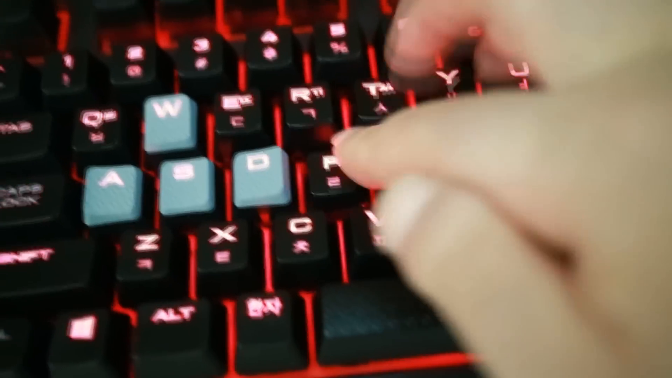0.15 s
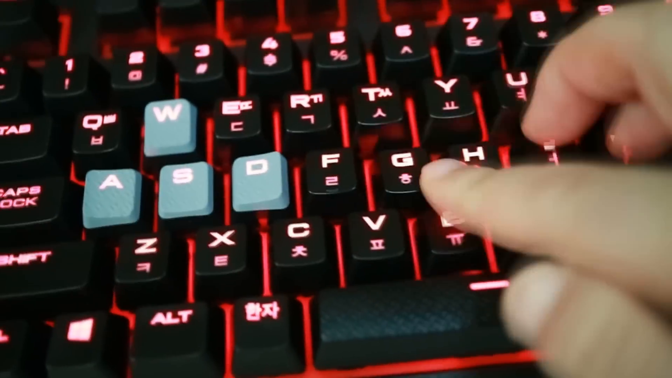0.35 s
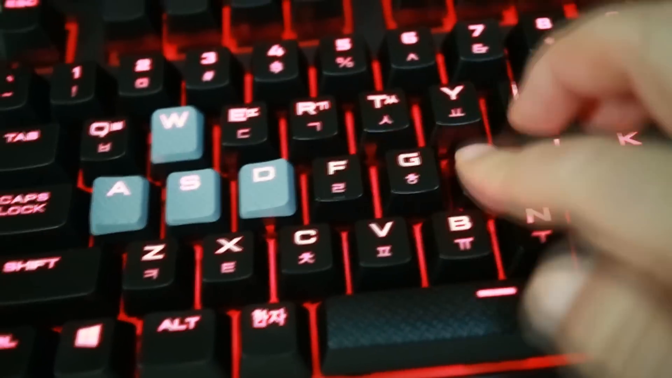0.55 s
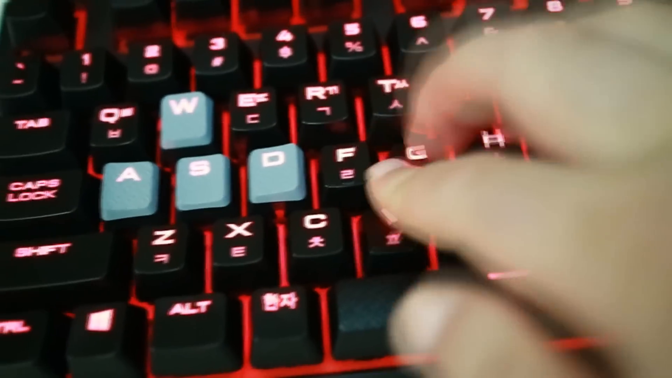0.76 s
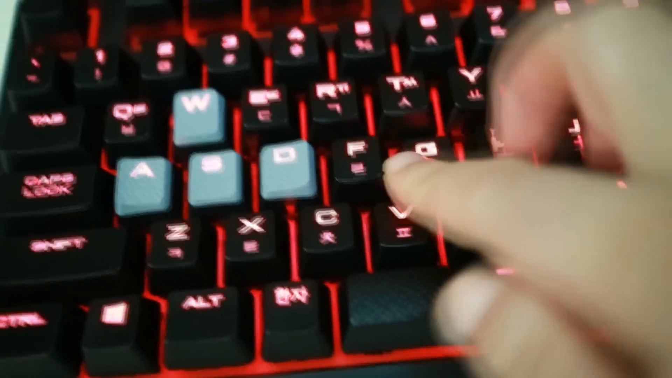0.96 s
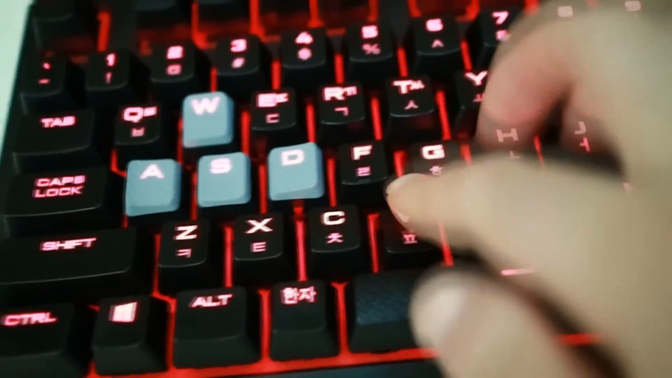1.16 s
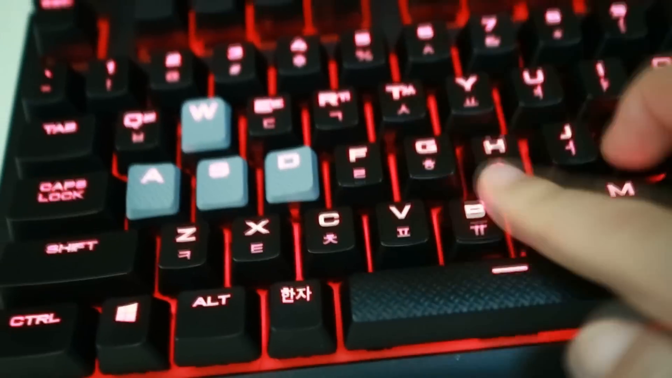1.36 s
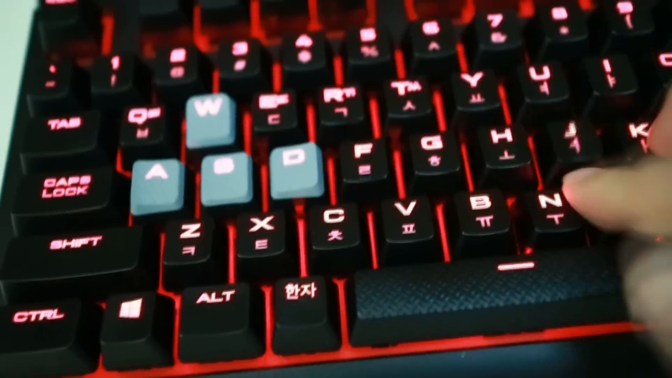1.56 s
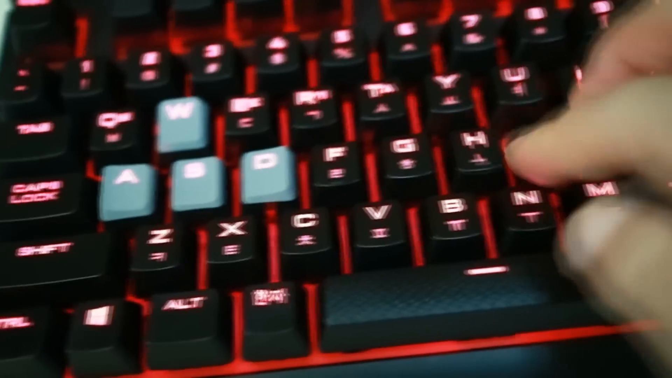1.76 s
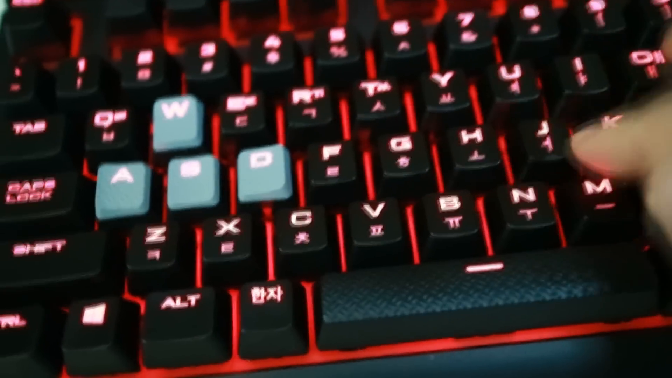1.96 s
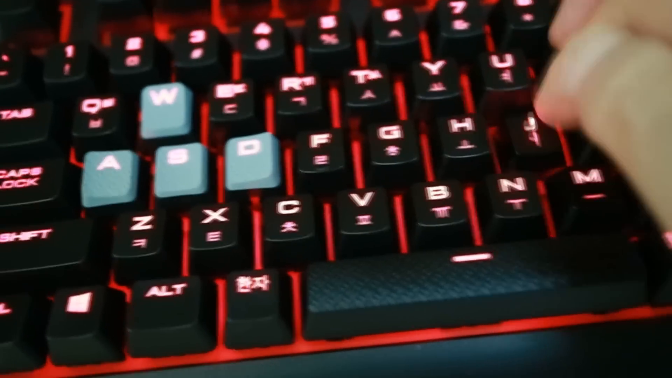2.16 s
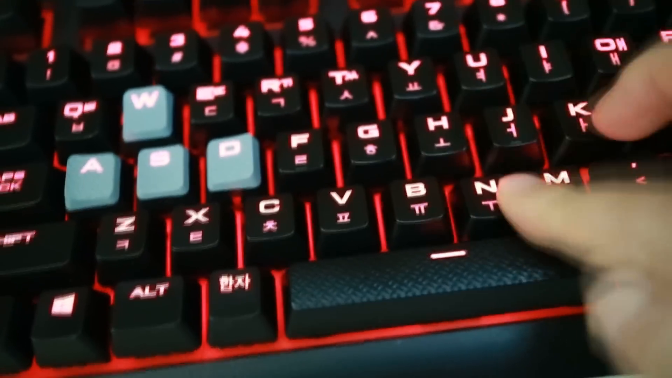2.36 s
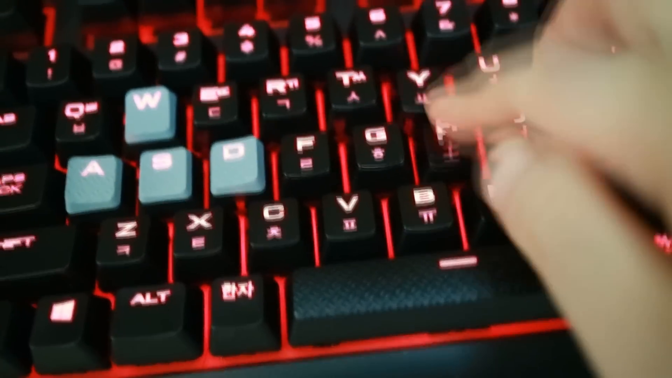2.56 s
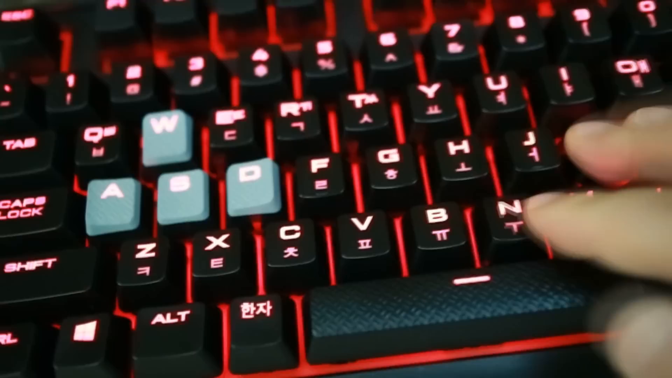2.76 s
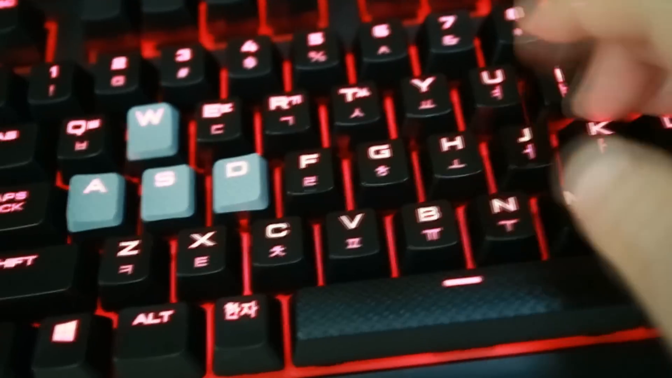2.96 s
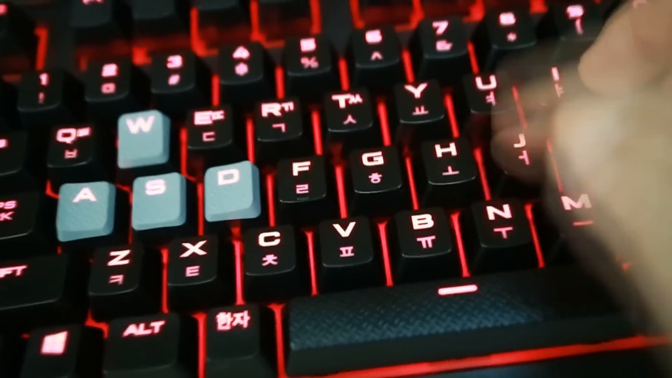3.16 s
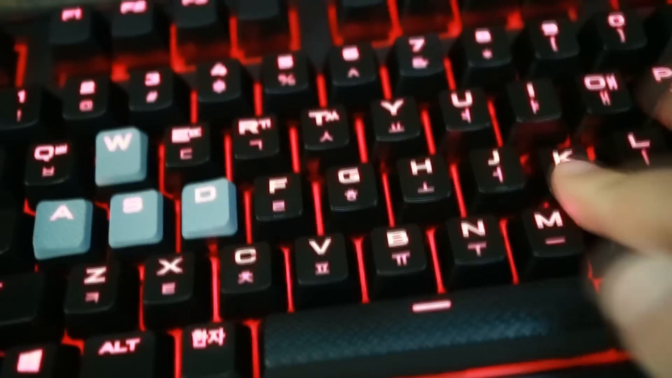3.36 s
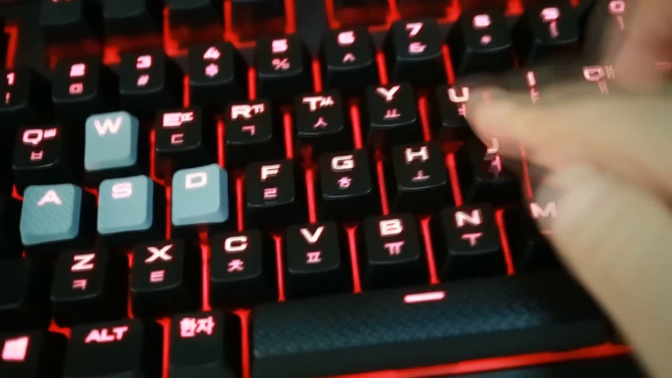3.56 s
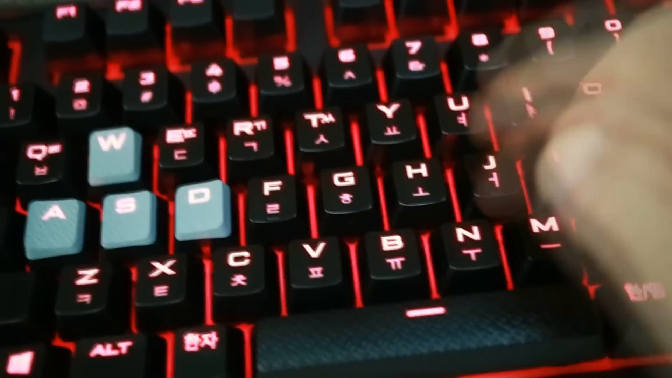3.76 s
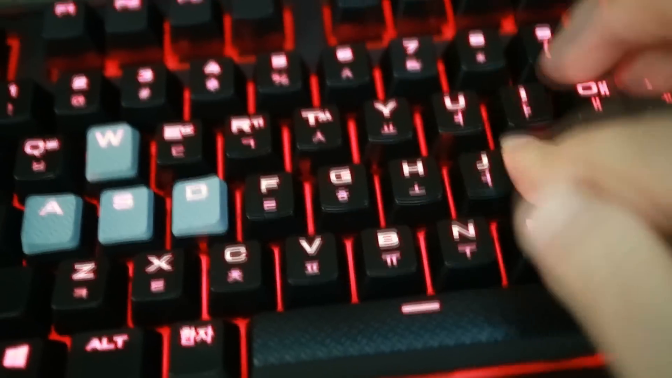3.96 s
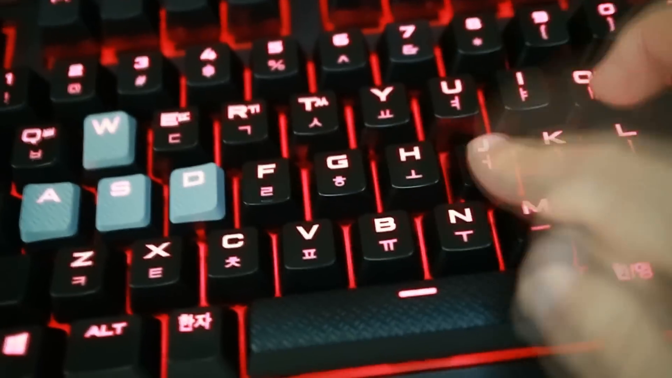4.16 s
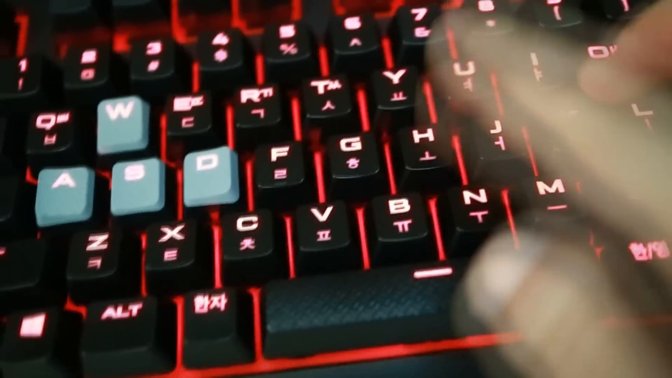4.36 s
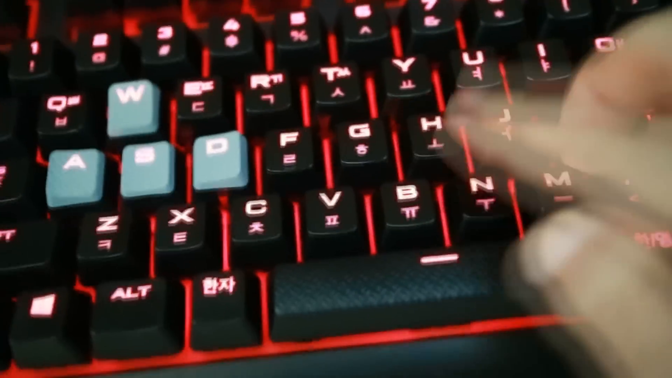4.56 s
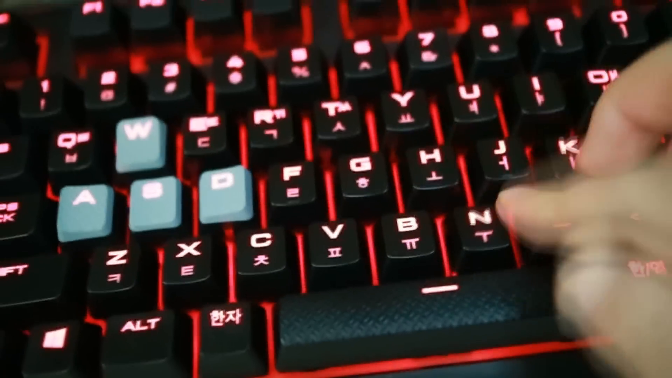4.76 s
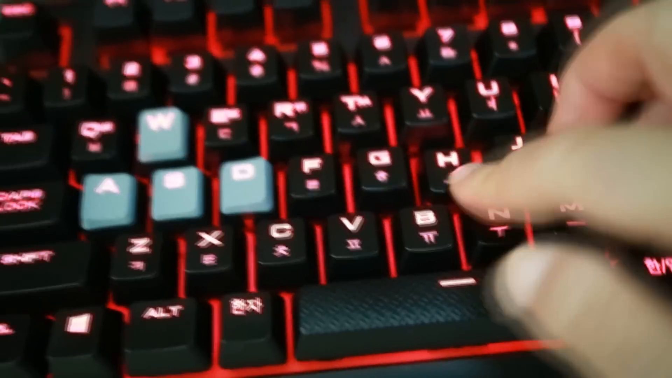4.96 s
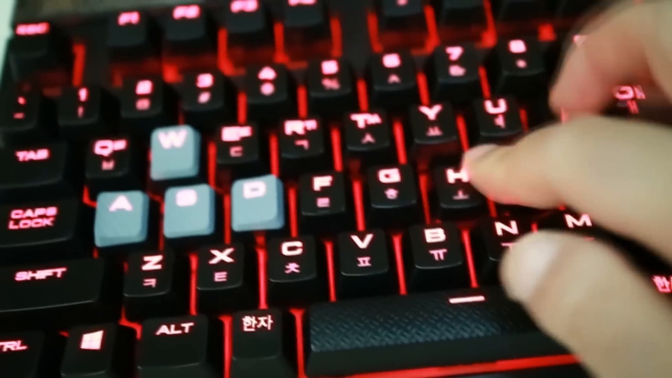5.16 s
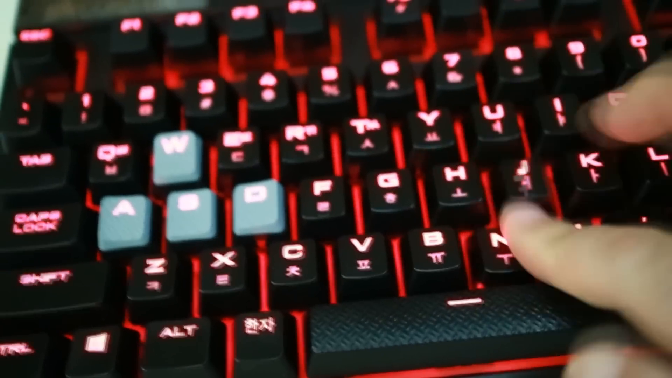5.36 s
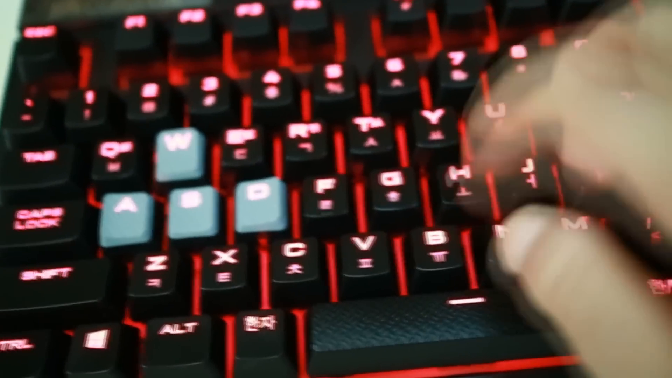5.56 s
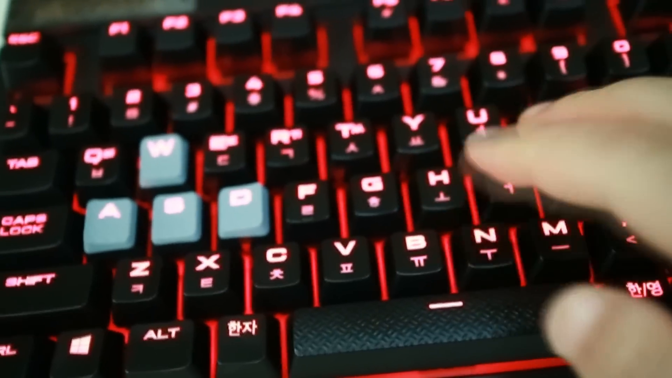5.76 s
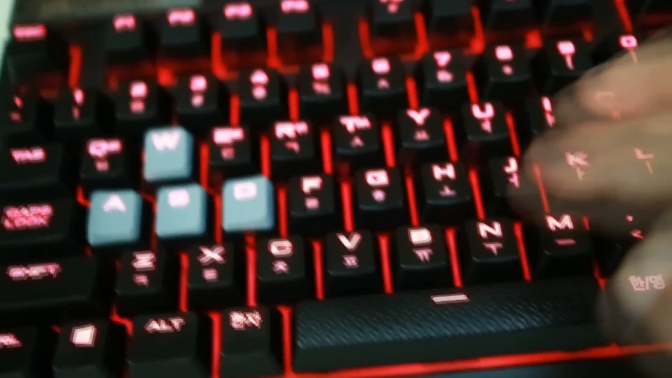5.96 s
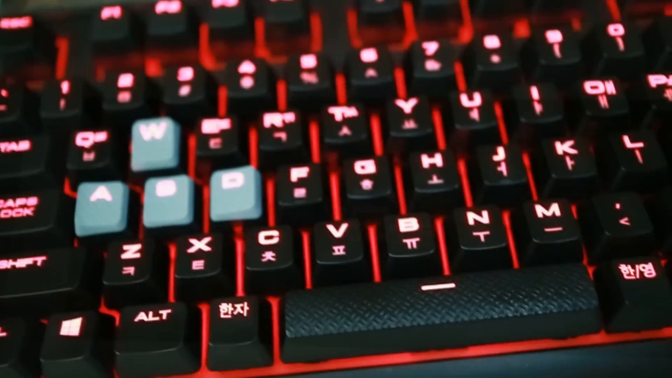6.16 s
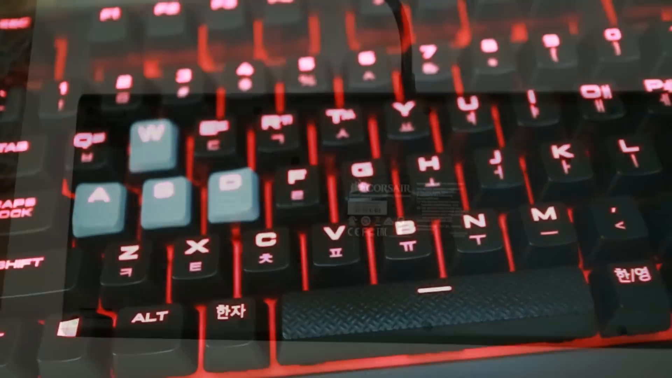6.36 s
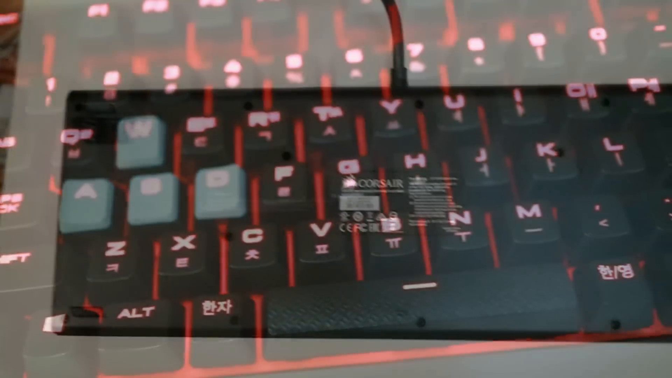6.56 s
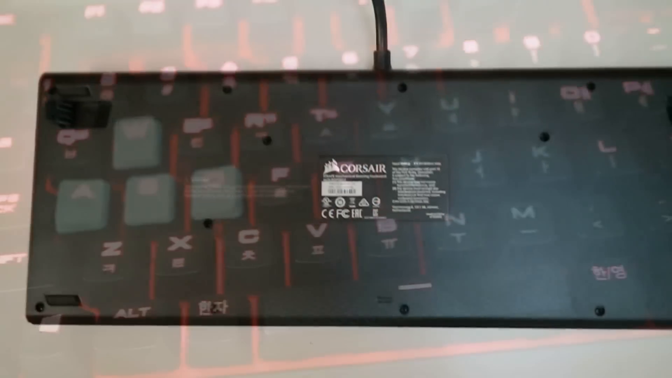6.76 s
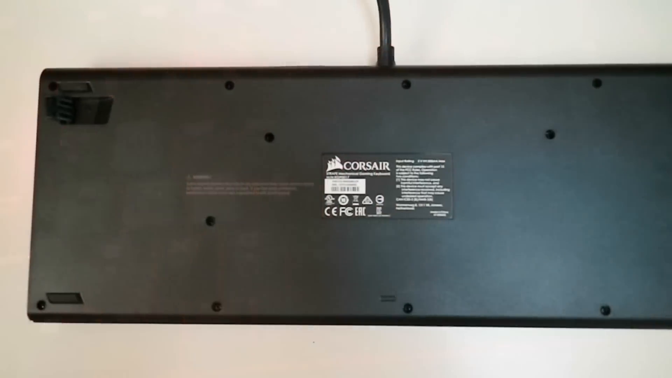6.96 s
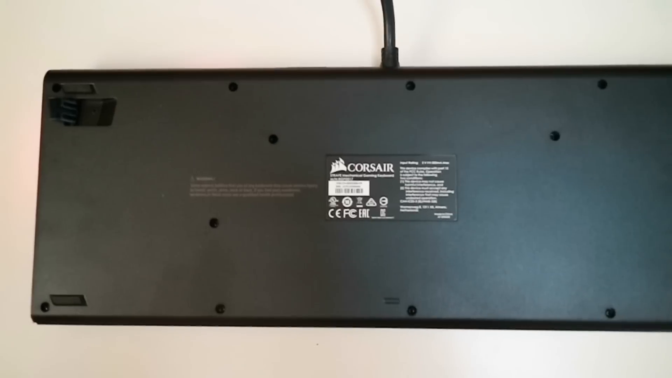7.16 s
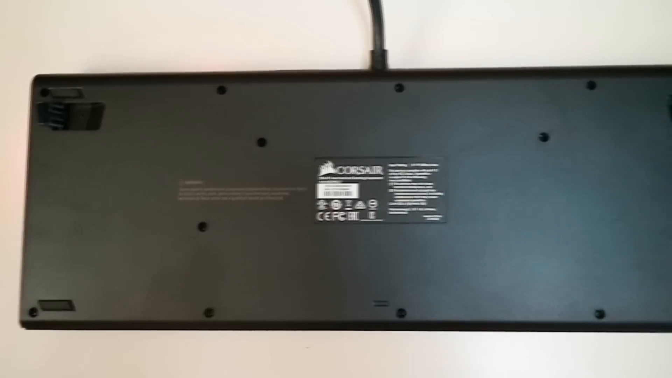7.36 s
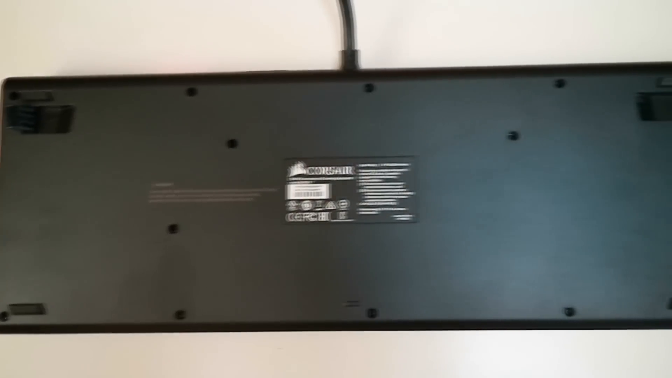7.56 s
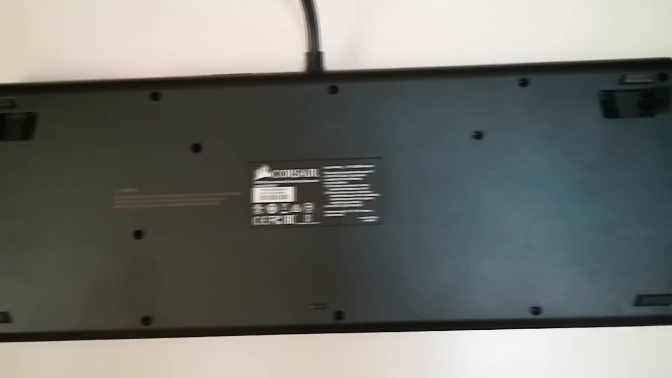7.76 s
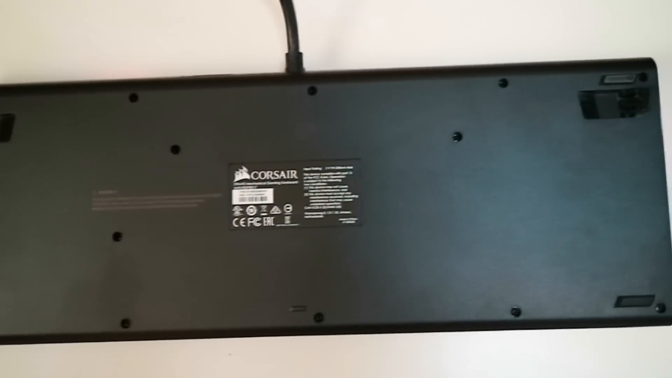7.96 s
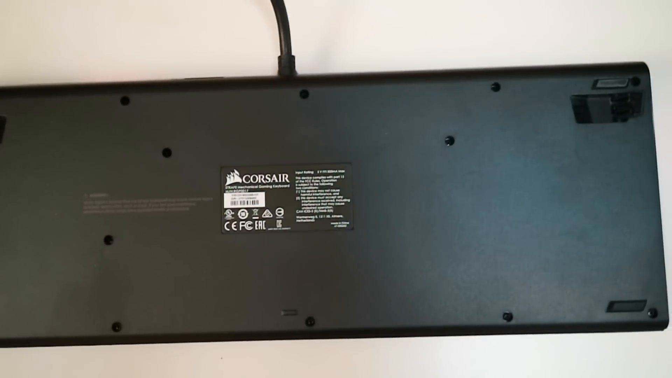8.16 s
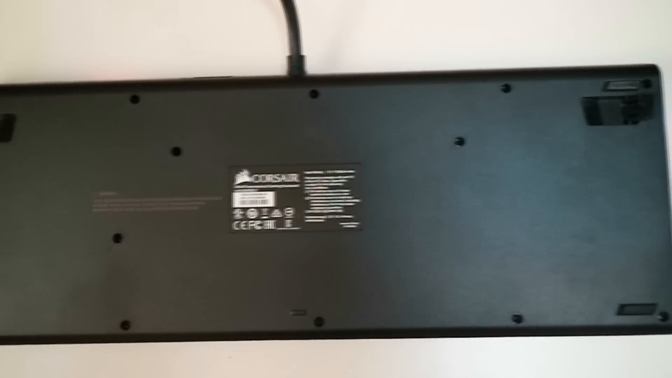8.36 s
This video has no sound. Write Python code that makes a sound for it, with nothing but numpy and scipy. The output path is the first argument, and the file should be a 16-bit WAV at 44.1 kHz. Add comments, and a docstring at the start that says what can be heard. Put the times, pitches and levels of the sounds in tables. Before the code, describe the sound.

A rapid run of hard plastic keystrokes, with treble cracks and low desk thumps, breaks off abruptly, leaving faint room noise and tiny taps.

```python
"""Fingers type fast on a mechanical keyboard on a desk, close to a phone's two microphones, in a quiet room.
Each contact of key stem, cap and plate is a short cap click and a noisy treble crack; decaying modes ring
the case and thump the desk, and noise lingers after. Stems scrape and rebound, loose caps rattle.
The typing stops and the room's hush remains, shaped noise with faint steady tones, with a few faint taps."""
import sys
import numpy as np
from scipy import signal
from scipy.fft import rfft, irfft, next_fast_len
from scipy.io import wavfile
from scipy.ndimage import uniform_filter1d

SR = 44100
rng = np.random.default_rng(int(sys.argv[2]) if len(sys.argv) > 2 else 0)


def elevation(decibels):
    """Turn decibel levels (scalar or array-like) into linear amplitude ratios."""
    levels = np.asarray(decibels, float)
    return 10 ** (levels / 20)


def generate_wav(signal):
    """Clip the signal to [-1, 1] and save it as 16-bit WAV at the path in sys.argv[1]."""
    frames = np.transpose(np.atleast_2d(signal))
    scaled = np.clip(frames, -1, 1) * 32767
    pcm = np.round(scaled).astype(np.int16)
    wavfile.write(sys.argv[1], SR, pcm)


N = 370440

# The four contact tables give clicks before the keyboard's radiation and stereo lean.
# Stems striking the plate at the end of their travel, a sharp click.
# Each row: start in seconds, click peak in dB, cap pitch in Hz.
PLATE_STRIKES = [(.1143,-12,2600),(.2856,-4,2210),(.3183,-26,3020),(.3299,-2.5,2860),(.472,-12.5,3160),(.4884,-6.5,2780),(.5159,-18.5,3440),
                 (.6414,-10.5,3020),(.6485,-1.5,2990),(.703,-20.5,4930),(.7179,-3,2620),(.845,-22,3300),(.8571,-19.5,3620),(1.0562,-9.5,3740),(1.0686,-14,2900),(1.1234,-14,4400),(1.1408,-10.5,3080),
                 (1.3335,2,2740),(1.3434,-12,2300),(1.3504,-2,2680),(1.4529,-13.5,3200),(1.461,-4.5,3010),(1.6305,-12,3100),(1.6384,-14,1740),(1.6966,-12.5,2590),
                 (1.8639,-1.5,2700),(1.8695,-9,2760),(2.0144,-9.5,3240),(2.6762,-22,3100),(2.6898,-3.5,2880),(2.8171,-15.5,2300),
                 (3.018,-17,3100),(3.0253,-4.5,2500),(3.033,-12.5,2400),(3.1652,-15.5,2240),(3.2637,-23,2840),(3.2731,-7,2450),(3.4351,-12.5,2940),(3.4664,-11,2280),
                 (3.6142,-4.5,2280),(3.6345,-6,2750),(3.7,-4,2230),(3.743,0.5,2310),(3.7922,-17.5,2830),(4.0126,-14,2500),
                 (4.151,-16,2500),(4.3071,-15,3440),(4.3119,-11,2200),(4.368,-35.5,3000),(4.3822,-15.5,2350),(4.5571,-13.5,3430),(4.6246,-23,3330),(4.8227,-19,2600),
                 (4.8804,-22.5,3070),(4.89,-4.5,2480),(5.0308,-23.5,3200),(5.0448,-13,3350),(5.1103,-7,2260),(5.121,-15,2300),(5.2777,-17.5,3300),(5.3265,-10,2600),(5.4727,-6.5,3540),
                 (5.4846,-4,2800),(5.502,-18,3000),(5.7445,-8.5,3320),(5.814,-2.5,2540),(5.8303,-17,2900),(5.965,-29.5,4000),(6.0905,-17.5,2750)]
# Fingers landing on caps and keys springing back against their housings,
# a knock with more case ring and more treble crack.
# Each row: start in seconds, click peak in dB, cap pitch in Hz.
KNOCKS = [(.0058,-14,2870),(.0327,-17.5,2890),(.0463,-16.5,3160),(.0641,-12,1080),(.071,-13,3240),(.087,-18,2000),(.161,-17.5,1490),(.2026,-27,4900),(.2296,-15.5,2970),(.2322,-12.5,2616),
          (.354,-12.5,2200),(.3772,-7,1980),(.4395,-5,2090),(.545,-8,3500),(.5555,-11,2820),(.7446,-14,2780),(.8222,-25,1430),
          (.8369,-13.5,2920),(.9094,-11.5,2950),(.9176,-12,2060),(.957,-29,2150),(.993,-4.5,3400),(1.022,-19.5,1360),(1.0354,-15.5,2380),
          (1.1318,-7,2300),(1.1531,-10,2100),(1.1908,-22.5,1300),(1.2258,-20.5,2840),(1.2325,-7.5,3580),(1.2401,-13,2180),(1.3261,-12,3200),
          (1.4073,-14.5,2320),(1.4303,-16.5,2340),(1.532,-21,1560),(1.7598,-21,1740),(1.7738,-14.5,2400),(1.8098,-28.5,2970),
          (1.8561,-18,3000),(1.9155,-29.5,2820),(1.9298,-21.5,2400),(1.9432,-8.5,2300),(1.9609,-23.5,2270),(2.0086,-19.5,2300),(2.0699,-17,2420),(2.1535,-14.5,2540),
          (2.171,-9.5,1590),(2.2367,-28.5,1550),(2.2534,-18,2480),(2.2613,-16.5,2350),(2.303,-31.5,2900),(2.3306,-12,2900),(2.422,-19,2300),(2.461,-16.5,3160),(2.4732,-15,4000),(2.5033,-25,2300),
          (2.5391,-18,2300),(2.5967,-20,2900),(2.623,-18,3480),(2.75,-14.5,2990),(2.7647,-19,3260),(2.8237,-13.5,3440),(2.9437,-14.5,2940),
          (3.06,-22,2020),(3.0715,-22,1750),(3.1362,-14.5,1820),(3.1568,-16,3280),(3.3151,-14,2200),(3.3567,-33,2400),(3.423,-10.5,1850),(3.457,-12,1940),
          (3.5552,-27,1290),(3.588,-14.5,2800),(3.5948,-19,1690),(3.6871,-10.5,1900),(3.8088,-12.5,2300),(3.8142,-21.5,1960),(3.8968,-22.5,1630),
          (3.9078,-23.5,2270),(3.9606,-13,2100),(3.995,-41,3000),(4.0493,-39,2990),(4.1856,-30.5,2300),(4.2733,-30.5,2300),(4.4289,-21.5,2300),(4.4862,-42,2360),
          (4.549,-27.5,3420),(4.6528,-27.5,2280),(4.66,-36.5,1810),(4.6861,-28.5,5000),(4.6997,-27,3030),(4.7308,-29.5,3450),(4.7803,-21,1730),(4.805,-26,2400),(4.9416,-20,1720),(4.9895,-16,2130),
          (5.0025,-14.5,2200),(5.1041,-21,3220),(5.1597,-13,2890),(5.2214,-17,1540),(5.2335,-16,2260),(5.2621,-16,3300),(5.3427,-13,2410),
          (5.5236,-19.5,3300),(5.6078,-15,3160),(5.6404,-11,1570),(5.691,-21.5,1690),(5.7163,-18,1700),(5.7283,-10,2420),(5.7345,-16,1000),(5.8066,-26,3800),
          (5.8636,-27.5,3430),(5.9443,-46,2840),(5.9791,-31,4400),(5.9868,-11,2300),(6.0484,-32.5,3350),(6.0723,-19.5,3230),(6.0804,-22,2320)]
# Three loud, low-pitched clacks with a strong treble crack, perhaps a wide key.
# Each row: start in seconds, click peak in dB, cap pitch in Hz.
CLACKS = [(2.4021, -1.5, 1950), (2.8573, -1.5, 2080), (4.0741, -1.5, 1780)]
# Caps tilting under fingers that move on, a light tick.
# Each row: start in seconds, click peak in dB, cap pitch in Hz.
TICKS = [(.1276,-18.5,3400),(.2743,-25.5,2800),(.4995,-17.5,3360),(.6596,-29.5,3000),(.7296,-21.5,2330),(.9445,-24.5,1900),(1.1283,-13.5,3100),(1.2641,-22,3400),
         (1.401,-23.5,3270),(1.4411,-26.5,2750),(1.4918,-21.5,2630),(1.4993,-24.5,3190),(1.997,-28,3400),(2.0048,-21,2400),(2.4787,-24.5,2020),(2.728,-18,2240),(2.9555,-19,1940),
         (3.7097,-12.5,2330),(3.8337,-31.5,2600),(3.8459,-22.5,2930),(3.9293,-21,3060),(4.1571,-28,2400),(4.9332,-27,3000),(5.6209,-21,3360),(5.7103,-21.5,4500),(6.0014,-30,2020)]

# Push into the case, which steers case ring, tail and rattle.
# Each pair: dB relative to a click at full scale, dB more for each dB that the click is softer.
STRIKE_CASE, KNOCK_CASE, CLACK_CASE, TICK_CASE = (-21, 0.074), (-14.5, 0.47), (-17, 0.1), (-17.5, 0.091)
# Drive of the desk thump, to which THUMP_COURSE and the mode levels add.
# Each pair: dB for a click at full scale, dB less for each dB that the click is softer.
STRIKE_THUMP, KNOCK_THUMP, CLACK_THUMP, TICK_THUMP = (-42, 0.29), (-35, 0.61), (-43, 0.4), (-51, 0.4)
# Typical stem crack relative to the click in dB: plate strikes, knocks, clacks, ticks.
CRACK_DB = (-21, -11, -14.5, -15.5)

# Colour of the stem crack. Each row: frequency in Hz, relative level in dB per Hz.
CRACK_COLOUR = [(3000, -26), (5000, -11), (7800, -10.5), (10500, -23), (16000, -39)]
# Plate and case modes. Each row: frequency in Hz, relative level in dB, time to fall 60 dB in seconds.
CASE_MODES = [(526.5, -8, 0.052), (691, -8, 0.112), (745, 1.5, 0.086), (896.6, 1, 0.049), (964, -7, 0.18),
              (1058, -7.5, 0.12), (1211, -1.5, 0.11), (1303, -7.5, 0.089)]
# Desk modes. Each row: frequency in Hz, relative level in dB, time to fall 60 dB in seconds.
DESK_MODES = [(172.3, 7.5, 0.12), (259, -2.5, 0.1), (325, 9.5, 0.11)]
# The desk thump swells and sinks over the typing. Each row: time in seconds, added level in dB.
THUMP_COURSE = [(0.0, 0.5), (4.0, 0.5), (4.5, -6), (5.1, 5.5), (5.5, -1), (5.75, 1.5), (6.2, -4)]
# What lingers after a click.
# Each row: frequency in Hz, relative starting level in dB per Hz, time to fall 60 dB in seconds.
LINGER = [(272.5, -14.5, 0.085), (706, -5, 0.17), (2300, -4, 0.14), (3900, -6.5, 0.13), (5000, -12, 0.12),
          (9200, -21.5, 0.14), (10930, -35, 0.1), (15940, -47.5, 0.059)]
# Colour of the stem's scrape. Each row: frequency in Hz, relative level in dB per Hz.
SCRAPE_COLOUR = [(300, -20), (1000, -3), (3000, 2.5), (8000, -13), (15000, -42.5)]
# Stereo lean of the keyboard. Each row: frequency in Hz, left minus right in dB.
LEAN = [(150, -4.5), (500, 3), (3000, -3), (15000, 0)]

# Faint ticks in the quiet. Each row: start in seconds, approximate peak in dB, pitch in Hz.
TAPS = [(6.719, -52, 2750), (6.72, -62, 4730), (7.08, -57, 3020), (7.426, -56, 3080)]
# Rings that make up one dull tap. Each row: pitch in Hz, approximate peak in dB.
DULL_TAP = [(520, -41), (1000, -38), (2200, -51), (3400, -56)]

# Colour of the room hush. Each row: frequency in Hz, relative level in dB per Hz.
HUSH_COLOUR = [(20, -36.5), (60, -15.5), (145, -16), (210, -2), (415, -10), (500, -3.5), (844, -11),
               (1700, -16), (3500, -26.5), (12000, -45), (15000, -60.5)]
# Left-right likeness of the hush. Each row: frequency in Hz, correlation from -1 to 1.
HUSH_ALIKE = [(100, 0.394), (400, -0.11)]
# Base level of the hush, to which HUSH_COURSE adds. Each row, left then right: rms level in dB.
HUSH_DB = [
    [-54.5],
    [-56.5],
]
# The hush sinks slowly through the typing and a little further after it.
# Each row: time in seconds, added level in dB.
HUSH_COURSE = [(0, 4.5), (6.2, 1), (7.5, 0.5), (8.4, 0)]
# Faint steady tones in the room. Each row: frequency in Hz, rms level in dB.
HUM = [(112, -80), (1130, -74.5), (1922, -91)]


def along(points, hz):
    """Reads (Hz, value) points on a log frequency axis."""
    f, v = np.transpose(points)
    return np.interp(np.log(hz + 1), np.log(f + 1), v)


def unit(x):
    """Brings each row to rms 1."""
    return x / np.sqrt(np.mean(x ** 2, axis=-1, keepdims=True) + 1e-20)


def filtered(x, response):
    """Multiplies the spectrum of x by a complex response of frequency."""
    n = x.shape[-1]
    padded = next_fast_len(n + min(n // 4, 4096))
    hz = np.fft.rfftfreq(padded, 1 / SR)
    return irfft(rfft(x, padded) * response(hz), padded)[..., :n]


def placed(times, sounds):
    """Adds sounds (events, channels, samples) at their times in seconds."""
    out = np.zeros((2, N + SR))
    for s, sound in zip(times, sounds):
        out[:, round(s * SR):][:, :sound.shape[-1]] += sound
    return out[:, :N]


def gains(db):
    """Level factors shaped to scale (events, channels, samples)."""
    return elevation(db)[:, None, None]


def pair(count, size, alike):
    """Noise for both microphones, partly shared."""
    shared, left, right = np.moveaxis(rng.standard_normal((count, 3, size)), 1, 0)
    own = np.stack([left, right], axis=1)
    return np.sqrt(alike) * shared[:, None] + np.sqrt(1 - alike) * own


def contacts():
    """All kinds of contact with the case push, thump drive and crack that their kind and strength bring."""
    kinds = [(PLATE_STRIKES, STRIKE_CASE, STRIKE_THUMP), (KNOCKS, KNOCK_CASE, KNOCK_THUMP),
             (CLACKS, CLACK_CASE, CLACK_THUMP), (TICKS, TICK_CASE, TICK_THUMP)]
    groups = []
    for (table, case, thump), crack_db in zip(kinds, CRACK_DB):
        s, db, hz = np.transpose(table)
        case_db = case[0] - case[1] * db
        thump_db = thump[0] + thump[1] * db
        groups.append([s, db, hz, case_db, thump_db, np.full(len(s), crack_db)])
    return np.concatenate(groups, axis=1)


def clicks(hz, cycles, spread=0.31, size=900):
    """A cap's short ring with a weaker detuned partner, peak near 1.

    Above 2800 Hz, higher caps swell slower and buzz for more cycles."""
    t = np.arange(size) / SR
    hz = hz[:, None, None]
    draw = rng.uniform(-1, 1, (len(hz), 2, 1))
    partner_hz = hz * np.exp(spread * draw[:, :1])
    stretch = np.maximum(hz / 2800, 1) ** 1.7
    decay = elevation(-60 * t * hz / (cycles * stretch))
    swell = 1 - np.exp(-(t * hz / (0.69 * stretch)) ** 2)
    main = np.sin(2 * np.pi * hz * t)
    partner = 0.67 * np.sin(2 * np.pi * partner_hz * t + 0.99 * draw[:, 1:])
    return -1.9 * decay * swell * (main + partner)


def cracks(count, size=900):
    """The hard plastic stem gives a treble crack of a few milliseconds."""
    noise = unit(filtered(pair(count, size, alike=0.64), lambda hz: elevation(along(CRACK_COLOUR, hz))))
    t = np.arange(size) / SR
    return noise * elevation(-60 * t / 0.015) * (1 - np.exp(-t / 0.00057))


def ringing(modes, count, scatter_db, detune, unlike, attack, size):
    """Each contact excites the modes at new strengths and pitches; the microphones differ in phase."""
    hz, db, t60 = np.transpose(modes)
    t = np.arange(size) / SR
    draw = rng.standard_normal((count, 5, len(modes)))
    strength = elevation(db + scatter_db * draw[:, :1]) * np.sign(draw[:, 1:2])
    phase = np.exp(1j * unlike * draw[:, 2:4])
    pole = 2j * np.pi * hz * (1 + detune * draw[:, 4]) - np.log(1000) / t60
    rings = np.imag((strength * phase) @ np.exp(pole[..., None] * t))
    return rings * (1 - np.exp(-t / attack)) ** 2


def case_rings(count, size=4500):
    """Plate and case modes ring while further small contacts keep shaking them."""
    wobble = uniform_filter1d(rng.standard_normal((count, 1, size)), size=220)
    jostled = elevation(3.4 * unit(wobble))
    return jostled * ringing(CASE_MODES, count, scatter_db=3.0, detune=0.03, unlike=0.86,
                             attack=0.0012, size=size)


def desk_thumps(count):
    """The desk's low modes swell more slowly and reach both microphones nearly in phase."""
    return ringing(DESK_MODES, count, scatter_db=5.5, detune=0.008, unlike=0.1884, attack=0.0093, size=7000)


def lingering(count, size=5120):
    """Dense plate modes and near reflections: noise that dies at a speed set by frequency.

    It is ragged as parts keep touching."""
    hz, t, z = signal.stft(pair(count, size, alike=0.51), SR, nperseg=256)
    band_hz, db, t60 = np.transpose(LINGER)
    start_db = along(list(zip(band_hz, db)), hz)[:, None]
    fall_s = along(list(zip(band_hz, t60)), hz)[:, None]
    patches = uniform_filter1d(rng.standard_normal((count, 1, len(hz), len(t))), size=9, axis=2)
    flutter = rng.standard_normal((count, 1, 1, len(t)))  # all frequencies together
    ragged_db = 5.1 * unit(patches) + 2.5 * flutter
    shaped = z * elevation(start_db - 60 * t / fall_s + ragged_db)
    tail = unit(signal.istft(shaped, SR, nperseg=256)[1][..., :size])
    return tail * (1 - np.exp(-np.arange(size) / SR / 0.00017))


def keys():
    """Every contact sums click, crack, case ring, desk thump and tail; ring and tail follow the case push."""
    s, db, hz, case_db, thump_db, crack_db = contacts()
    count = len(s)
    hardness_db = 4 * rng.standard_normal(count)
    course_db = np.interp(s, *np.transpose(THUMP_COURSE))
    out = placed(s, gains(db) * clicks(hz, cycles=9.5))
    out += placed(s, gains(db + crack_db + hardness_db) * cracks(count))
    out += placed(s, gains(db + case_db - 6.0) * case_rings(count))
    out += placed(s, gains(thump_db + course_db) * desk_thumps(count))
    return out + placed(s, gains(db + 0.92 * case_db - 16.5) * lingering(count))


def rebounds():
    """The stem rebounds once: a second, weaker click at the cap's pitch a moment after each contact."""
    s, db, hz = contacts()[:3]
    delay = rng.uniform(0.0022, 0.002294, len(s))  # seconds
    return placed(s + delay, gains(db - 8.5) * clicks(hz, cycles=8))


def slides(size=900):
    """The stem scrapes down its guide: faint noise that swells into each contact with room before it."""
    s, db = contacts()[:2]
    noise = unit(filtered(pair(len(s), size, alike=0.38), lambda hz: elevation(along(SCRAPE_COLOUR, hz))))
    swell_s = 0.0025
    swell = np.exp(-np.arange(size)[::-1] / SR / swell_s)
    level = gains(db - 22.5 + 4 * rng.standard_normal(len(s)))
    fits = s > size / SR  # the whole scrape lies after time zero
    return placed(s[fits] - size / SR, (level * noise * swell)[fits])


def rattle(count=9):
    """Loose caps and stems chatter just before and after each contact, weaker and at random pitch."""
    s, db, _, case_db = contacts()[:4]
    draw = rng.random((len(s), count, 4))
    delay = -0.022 * np.log(1 - draw[..., 0]) - 0.0015  # seconds
    fade_db = 220 * np.abs(delay)  # weaker further from the contact
    scatter_db = 4 * np.log(1 - draw[..., 1])
    size_db = (db + 0.85 * case_db)[:, None] - 11.0 - fade_db + scatter_db
    hz = 1100 * 3.6 ** draw[..., 2]
    crack_level = gains((-23.5 - 5.3 * draw[..., 3]).ravel())
    sound = clicks(hz.ravel(), cycles=25) + crack_level * cracks(hz.size)
    return placed(np.abs(s[:, None] + delay).ravel(), gains(size_db.ravel()) * sound)


def taps():
    """Faint ticks and one dull tap after the typing, each a short ring with a close partner."""
    dull_tap_s = 7.049
    dull_rows = [(dull_tap_s, db, hz) for hz, db in DULL_TAP]
    s, db, hz = np.transpose(list(TAPS) + dull_rows)
    return placed(s, gains(db) * clicks(hz, cycles=19.0, spread=0.099, size=2000))


def hush():
    """Smooth room noise: mid and side are balanced so that left and right are alike only in the bass."""
    def mid_side(hz):
        turn = np.arccos(np.clip(along(HUSH_ALIKE, hz), -1, 1)) / 2
        return elevation(along(HUSH_COLOUR, hz)) * [np.cos(turn), np.sin(turn)]

    mid, side = filtered(rng.standard_normal((2, N)), mid_side)
    course_db = np.interp(np.arange(N) / SR, *np.transpose(HUSH_COURSE))
    return elevation(HUSH_DB + course_db) * unit(np.array([mid + side, mid - side]))


def hum():
    """Steady tones, the same in both channels, whose phase drifts a little as a random walk."""
    hz, db = np.transpose(HUM)[:, :, None]
    drift = 0.018 * np.cumsum(rng.standard_normal((len(HUM), N)), axis=1)  # radians
    tones = np.sin(2 * np.pi * hz * np.arange(N) / SR + drift)
    return np.sum(np.sqrt(2) * elevation(db) * tones, axis=0)


def at_microphones(keyboard):
    """The small body radiates little deep bass and is heard at the right microphone first."""
    def response(hz):
        side = np.array([[1], [-1]])  # left, right
        lean = elevation(side * along(LEAN, hz) / 2)
        lag = np.exp(-1j * np.pi * side * hz * 4e-5)  # right leads left by 40 microseconds
        radiation = (1j * hz / (110 + 1j * hz)) ** 2
        return lean * lag * radiation

    return filtered(keyboard, response)


def scene():
    """The keyboard as the two microphones hear it, over taps, hush and steady tones."""
    keyboard = keys() + rebounds() + slides() + rattle()
    return at_microphones(keyboard) + taps() + hush() + hum()


def low_pass(x):
    """Removes everything above the highest recorded frequency."""
    return signal.sosfilt(signal.butter(12, 17010, fs=SR, output="sos"), x)


def record(dry):
    """Peaks are clipped at full scale, then everything from 16.4 kHz up is filtered out."""
    limited = filtered(np.clip(dry, -1, 1), lambda hz: hz < 16400)
    return low_pass(limited)


dry = scene()
out = record(dry)
generate_wav(out)
```